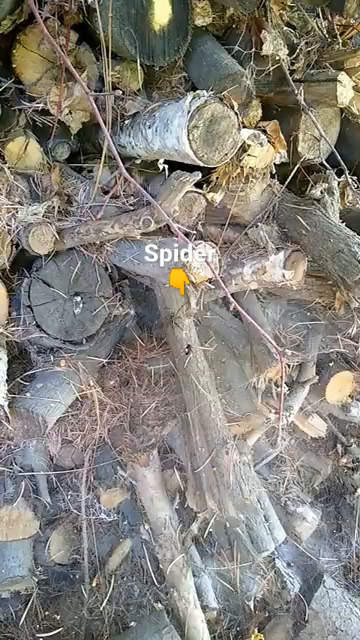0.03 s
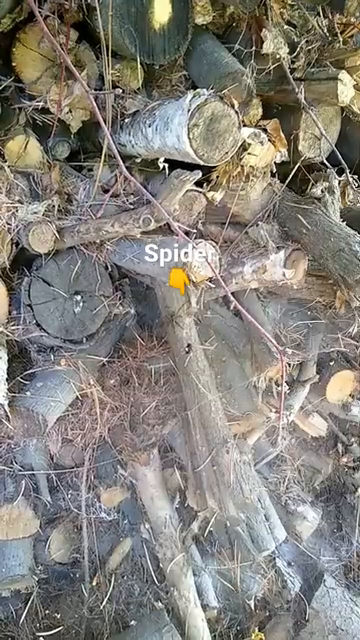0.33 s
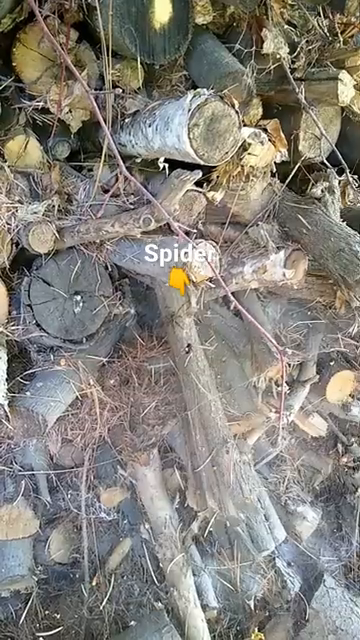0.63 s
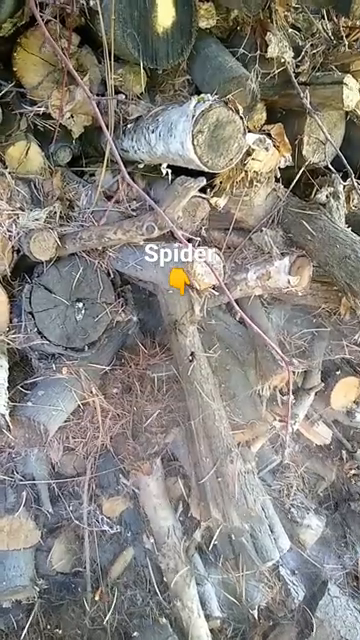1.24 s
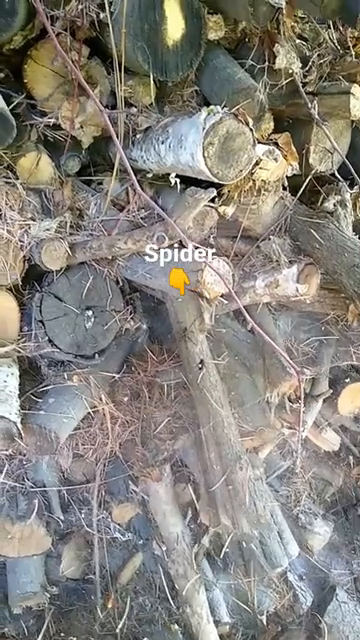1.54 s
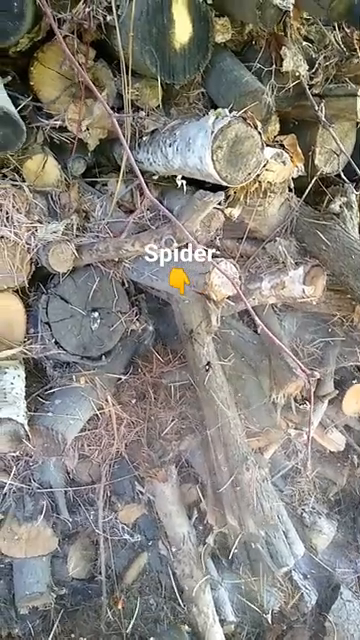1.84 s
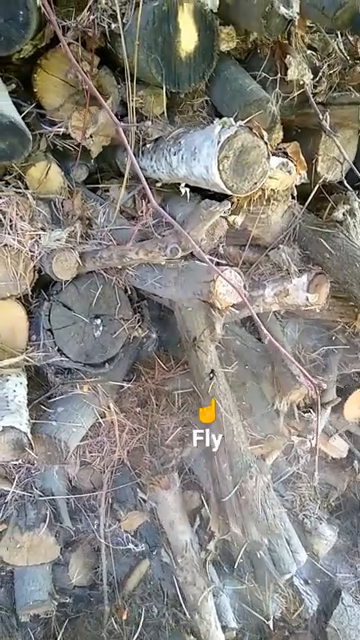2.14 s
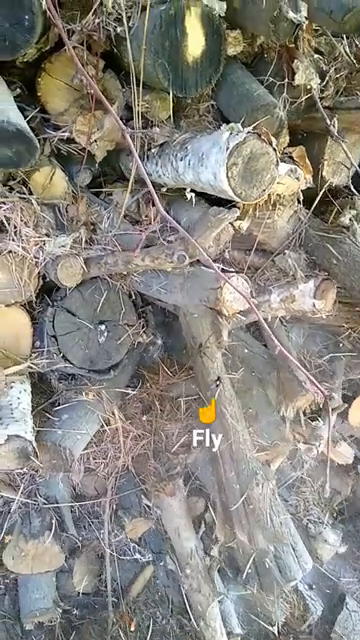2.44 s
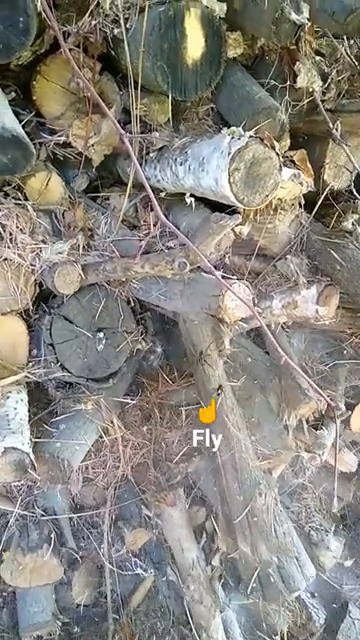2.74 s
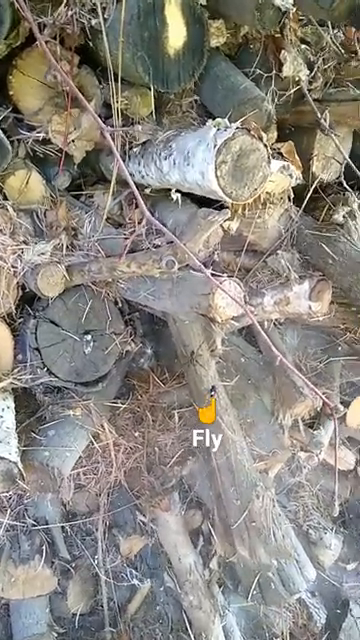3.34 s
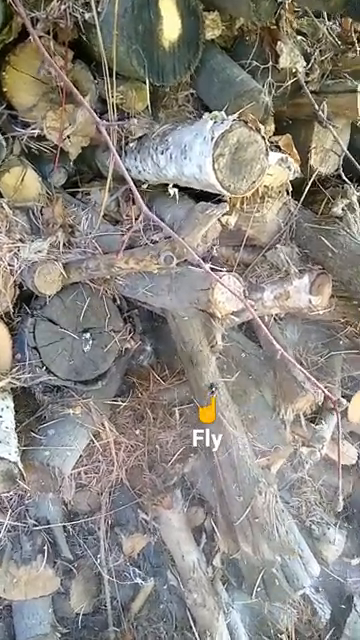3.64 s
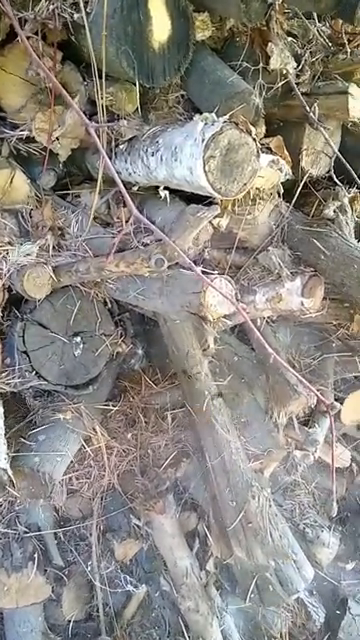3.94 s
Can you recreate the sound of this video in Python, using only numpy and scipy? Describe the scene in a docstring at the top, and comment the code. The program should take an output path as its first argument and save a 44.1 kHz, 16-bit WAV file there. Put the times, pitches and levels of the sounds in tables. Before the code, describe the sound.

Fingers tap and shift on a hand-held phone, close on the right, over quiet outdoor rumble and soft hiss. A distant drone swells from about 1.3 seconds and fades by 2.5. A sharp knock comes at 2 seconds, a lighter tap at 3. Small creaks start around 2.9 and thicken after 3.5, with the loudest knock at 3.8. Tiny ticks on the left and faint far bird chirps come occasionally.

```python
"""Fingers tap and shift on a hand-held phone, close to its right microphone: two sharp knocks, lighter
taps and small stick-slip creaks, all ringing the modes of the case. Tiny bright ticks sit on the left.
Behind them is quiet outdoor air by a woodpile: a low rumble, a soft wash and a distant drone that swells
and fades, each made of shaped noise. A few faint bird chirps echo off trees, over microphone hiss."""
import sys
import numpy as np
from scipy import signal
from scipy.fft import rfft, irfft
from scipy.io import wavfile
from scipy.ndimage import uniform_filter1d

SR = 44100
rng = np.random.default_rng(int(sys.argv[2]) if len(sys.argv) > 2 else 0)


def materialize(psi):
    """Save the field psi as 16-bit PCM at rate SR to the path in sys.argv[1].

    A 1-D psi becomes a single channel; in a 2-D psi each row is a channel.
    """
    bounded = np.clip(np.atleast_2d(psi).T, -1, 1)
    quanta = np.round(bounded * 32767).astype(np.int16)
    wavfile.write(sys.argv[1], SR, quanta)


N = 176400
T = np.arange(N) / SR

# finger taps: (time [s], snap [dB], crack [dB], thump [dB], thump pitch [ratio])
TAPS = [(1.9794, -33.5, -15, -24, 0.79), (3.0384, -35.5, -39.5, -32.5, 1.13),
        (3.7719, -45, -42, -33.5, 1.15), (3.8455, -15.5, -20.5, -25.5, 1.034)]
def taps(hard_top_hz=3450, soft_top_hz=2120, top_hz_per_db=41):
    """Fingers strike the case; a lighter tap has a duller crack."""
    out = np.zeros(N)
    hardest_db = max(row[2] for row in TAPS)
    for start_s, snap_db, crack_db, thump_db, pitch in TAPS:
        top_hz = max(hard_top_hz - top_hz_per_db * (hardest_db - crack_db), soft_top_hz)
        add(out, start_s, lowpass(contact(snap_db, crack_db, thump_db, pitch), top_hz, order=7))
    return out


# single skin slips: (time [s], level [dB])
SLIPS = [(1.822, -45), (2.889, -44.5), (2.94, -47), (2.991, -44.5), (3.143, -46), (3.49, -50),
         (3.525, -42.5), (3.543, -47), (3.555, -57), (3.559, -41.5), (3.576, -46), (3.678, -48),
         (3.71, -48), (3.722, -42.5), (3.732, -50), (3.744, -43.5), (3.763, -46), (3.789, -43.5),
         (3.803, -49), (3.818, -42.5), (3.876, -44.5), (3.895, -50), (3.914, -49), (3.932, -43),
         (3.947, -43.5), (3.993, -45.5)]
# grip shifts, runs of finer slips: (start [s], length [s], level [dB])
GRIP_SHIFTS = [(2.932, 0.16, -54.5), (3.13, 0.087, -55), (3.481, .12, -51), (3.75, 0.16, -49.5)]
def creaks(slips_per_s=120, scatter_db=6.5, top_hz=2120):
    """Skin sticks and slips on the case; each slip is a small push that rings it."""
    pushes = np.zeros(N)
    for start_s, db in SLIPS:
        add(pushes, start_s, undb([db]))
    for start_s, length_s, db in GRIP_SHIFTS:
        gaps, sizes = rng.random((40, 2)).T
        delays_s = np.cumsum(.25 + 1.5 * gaps) / slips_per_s
        for delay_s, offset_db in zip(delays_s, scatter_db * (1 - 2 * sizes)):
            if delay_s < length_s:
                add(pushes, start_s + delay_s, undb([db + offset_db]))
    slip = contact(snap_db=0, crack_db=-6, thump_db=-1, pitch=1.03)
    return lowpass(signal.fftconvolve(pushes, slip)[:N], top_hz, order=6)


# low case modes: (frequency [Hz], level [dB], t60 [s])
THUMP_MODES = [(79, -12.5, 0.15), (131.6, 3.5, 0.04), (240, -7, 0.014), (363, -14.5, 0.021)]
# high case modes: (frequency [Hz], level [dB], t60 [s])
CRACK_MODES = [(904, -18, 0.011), (1380, -20, 0.004), (1713, -2.5, 0.0054), (2050, -9.5, 0.0058),
               (2360, -13.5, 0.0062), (3300, -23.5, 0.012)]
def contact(snap_db, crack_db, thump_db, pitch, snap_hz=172, thump_lag_s=0.0028, thump_top_hz=393):
    """One touch: a sudden pressure step and a hard crack, then the soft thump of the whole case."""
    t = T[:SR // 4]
    snap = -np.cos(2 * np.pi * snap_hz * t) * decay(t, t60_s=0.017)
    crack = ring(CRACK_MODES, t)
    late_ring = np.interp(t - thump_lag_s, t, ring(THUMP_MODES, t, pitch))
    thump = lowpass(late_ring, thump_top_hz, order=4)
    return undb(snap_db) * snap + undb(crack_db) * crack + undb(thump_db) * thump


# case peaks and dips: (centre [Hz], width [Hz], gain [dB])
CASE_BANDS = [(193, 92, 3.5), (590, 205, -5), (920, 180, 4.5), (1100, 99, -1.5), (1300, 260, 0.5),
              (3350, 480, -3.5)]
def fingers(leak_db=-37, leak_top_hz=220):
    """The hollow case colours taps and creaks; only their bass reaches the left microphone."""
    right = taps() + creaks()
    for hz, width_hz, db in CASE_BANDS:
        band = signal.lfilter(*signal.iirpeak(hz, hz / width_hz, fs=SR), right)
        right = right + (undb(db) - 1) * band
    left = undb(leak_db) * lowpass(right, leak_top_hz, order=2)
    return np.array([left, right])


# ticks near the left microphone: (time [s], level [dB])
TICKS = [(1.386, -68), (2.1073, -67), (2.3203, -71), (2.4071, -71), (2.5059, -72), (2.571, -61.5),
         (2.792, -65), (3.3295, -68), (3.8768, -59)]
def ticks(centre_hz=11650, width_hz=3700, decay_s=0.0027, faint_count=14, faint_db=-76, right_db=-18):
    """Tiny finger ticks, each a few milliseconds of fizz, with fainter ones scattered between."""
    envelope = np.zeros(N)
    pulse = np.exp(-T[:SR // 10] / decay_s)
    for start_s, db in TICKS:
        add(envelope, start_s, undb(db) * pulse)
    first_s, last_s = TICKS[0][0], TICKS[-1][0]
    for place, size in rng.random((faint_count, 2)):
        add(envelope, first_s + place * (last_s - first_s), undb(faint_db) * size * pulse)
    baseband = lowpass(rng.standard_normal((2, N)), width_hz / 2, order=2)
    fizz = unit(baseband * np.cos(2 * np.pi * centre_hz * T))
    return envelope * fizz * undb([[0], [right_db]])


# rumble spectrum: (frequency [Hz], relative density [dB])
RUMBLE_SPECTRUM = [(15, -52), (30, -30.5), (43, -2.5), (54, -3.5), (62, 5), (70, 1), (85, -5.5), (115, -7),
                   (150, -19.5), (220, -26.5), (330, -24.5), (480, -41), (900, -70.5)]
# rumble envelope: (time [s], level [dB])
RUMBLE_LEVEL = [(.1, -47.5), (.4, -50), (.65, -45), (.9, -50), (1.1, -43.5), (1.3, -48.5), (1.55, -46.5),
                (1.798, -49.5), (2.05, -45.5), (2.4, -50), (2.75, -50), (3.0, -51.5), (3.08, -49),
                (3.19, -48.5), (3.259, -64.5), (3.45, -50), (3.55, -48.5), (3.681, -61), (3.85, -47.5),
                (4, -53.5)]
def rumble(left_lag_s=0.000392):
    """Low, uneven outdoor rumble that reaches the right microphone first."""
    left, right = bed(RUMBLE_SPECTRUM, RUMBLE_LEVEL, right_bias_db=5, side_db=-19.5, flutter_db=0.08)
    return np.array([np.interp(T - left_lag_s, T, left), right])


# drone spectrum: (frequency [Hz], relative density [dB])
DRONE_SPECTRUM = [(90, 10), (150, -1.5), (220, 5), (290, -4), (360, -17.5), (480, -35.5), (900, -53.5)]
# drone envelope: (time [s], level [dB])
DRONE_LEVEL = [(0, -68), (1.1, -78), (1.45, -51.5), (1.75, -53.5), (2.03, -46), (2.251, -54.5), (2.55, -69),
               (4, -61.5)]
def drone():
    """A distant drone, perhaps a passing car, swells and fades."""
    return bed(DRONE_SPECTRUM, DRONE_LEVEL, right_bias_db=1.5, side_db=-18, flutter_db=.35)


# air spectrum: (frequency [Hz], relative density [dB])
AIR_SPECTRUM = [(60, -12.5), (150, 8), (330, 0), (480, -2), (700, -6), (1000, -9), (2000, -18.5),
                (4000, -23.5), (8000, -34), (15000, -26)]
# air envelope: (time [s], level [dB])
AIR_LEVEL = [(.1, -66.5), (.7, -65.5), (1.9, -65), (2.4, -67), (3.1, -67.5), (3.3, -72), (3.55, -67),
             (3.7, -69), (4, -65)]
def air():
    """A soft, wide wash of open air."""
    return bed(AIR_SPECTRUM, AIR_LEVEL, right_bias_db=3.5, side_db=-1.5, flutter_db=.35)


# chirps: (start [s], length [s], start pitch [Hz], end pitch [Hz], level [dB], rasp [share of pitch])
CHIRPS = [(.33, 0.063, 3200, 3300, -86.5, 0.034), (.95, 0.072, 3450, 3500, -89, 0.013),
          (1.501, 0.054, 3050, 4000, -77.5, 0.051), (1.508, 0.067, 2380, 2520, -77, 0.053),
          (1.555, 0.038, 2255, 2230, -74, 0.0091), (2.822, 0.031, 2350, 2740, -78, 0.013),
          (2.845, 0.0473, 2900, 3350, -75.5, 0.026), (3.857, 0.026, 2400, 2320, -74, .01),
          (3.97, 0.036, 3420, 3210, -75.5, 0.019), (3.986, 0.026, 2710, 2600, -74, 0.014)]
def birds(rasp_hz=692, octave_db=-14, echo_db=-2.5, echo_t60_s=.2):
    """Far chirps: thin, partly raspy whistles that glide and level off, scattered by the trees."""
    song = np.zeros(N)
    waver = walk(rasp_hz)
    for start_s, length_s, from_hz, to_hz, db, rasp in CHIRPS:
        progress = np.linspace(0, 1, int(length_s * SR))
        glide_hz = from_hz + (to_hz - from_hz) * np.sin(np.pi / 2 * progress) ** 2
        jitter = rasp * np.roll(waver, -int(start_s * SR))[:len(progress)]
        phase = 2 * np.pi * np.cumsum(glide_hz * (1 + jitter)) / SR
        whistle = np.sin(phase) + undb(octave_db) * np.sin(2 * phase)
        envelope = np.sqrt(np.abs(np.sin(np.pi * progress)))
        add(song, start_s, undb(db) * envelope * whistle)
    trees = rng.standard_normal((2, SR)) * decay(T[:SR], echo_t60_s)
    echoes = np.array([signal.fftconvolve(song, tail / np.linalg.norm(tail))[:N] for tail in trees])
    return song + undb(echo_db) * echoes


# hiss spectrum: (frequency [Hz], relative density [dB])
HISS_SPECTRUM = [(1000, -2), (4000, 0), (7500, -1.5), (9500, -1), (12000, .8), (15500, -.5)]
# hiss envelope: (time [s], level [dB])
HISS_LEVEL = [(0, -82.5), (1.4, -81), (2.3, -79), (3.1, -79.5), (3.35, -82), (3.55, -79.5), (4, -78.5)]
def hiss(right_db=-2.1):
    """Independent self-noise of the two microphones."""
    pair = np.array([noise(HISS_SPECTRUM), undb(right_db) * noise(HISS_SPECTRUM)])
    return pair * undb(level_db(HISS_LEVEL))


def bed(spectrum, curve, right_bias_db, side_db, flutter_db):
    """Stereo noise that follows a level curve and flutters a little."""
    mid = noise(spectrum)
    side = undb(side_db) * noise(spectrum)
    pair = np.array([mid + side, mid - side]) / np.hypot(1, undb(side_db))
    envelope = undb(level_db(curve) + flutter_db * walk(rate_hz=10))
    return pair * envelope * undb([[-right_bias_db / 2], [right_bias_db / 2]])


def noise(spectrum):
    """Noise of rms 1 with a (Hz, dB) colour."""
    hz, db = np.array(spectrum).T
    bins_hz = np.maximum(np.fft.rfftfreq(N, 1 / SR), 1)
    gain = undb(np.interp(np.log(bins_hz), np.log(hz), db))
    return unit(irfft(rfft(rng.standard_normal(N)) * gain, N))


def walk(rate_hz):
    """Random wander of rms 1."""
    hold = int(SR / rate_hz)
    steps = np.repeat(rng.standard_normal(N // hold + 1), hold)
    return unit(uniform_filter1d(steps, hold)[:N])


def ring(modes, t, pitch=1):
    """Damped modes set off by a push."""
    return sum(undb(db) * np.sin(2 * np.pi * hz * pitch * t) * decay(t, t60_s) for hz, db, t60_s in modes)


def decay(t, t60_s):
    """Exponential fall of 60 dB in t60_s."""
    return np.exp(-np.log(1000) * t / t60_s)


def level_db(curve):
    """(s, dB) points to a level per sample."""
    return np.interp(T, *np.array(curve).T)


def lowpass(x, hz, order):
    """Butterworth low-pass."""
    return signal.sosfilt(signal.butter(order, hz, fs=SR, output="sos"), x)


def add(out, start_s, sound):
    """Mix a sound in at a time."""
    i = int(np.clip(start_s * SR, 0, N - 1))
    out[i:i + len(sound)] += sound[:N - i]


def undb(db):
    """Decibels to gain."""
    return 10 ** (np.asarray(db) / 20)


def unit(x):
    """Scale to rms 1."""
    return x / np.sqrt(np.mean(x ** 2))


def scene():
    """Everything at the two microphones."""
    return rumble() + air() + drone() + hiss() + birds() + ticks() + fingers()


def record(dry, open_s=0.081, fade_s=0.026, low_cut_hz=46.6, top_hz=15500):
    """The phone opens its input after a moment and cuts the deepest bass and the top."""
    fade_in = np.clip((T - open_s) / fade_s, 0, 1)
    thinned = signal.sosfilt(signal.butter(4, low_cut_hz, "high", fs=SR, output="sos"), dry * fade_in)
    return signal.sosfilt(signal.ellip(10, .2, 70, top_hz, fs=SR, output="sos"), thinned)


dry = scene()
out = record(dry)
materialize(out)
```